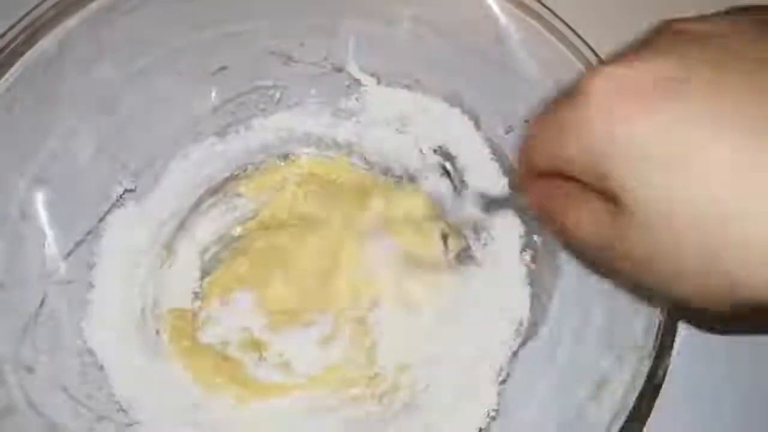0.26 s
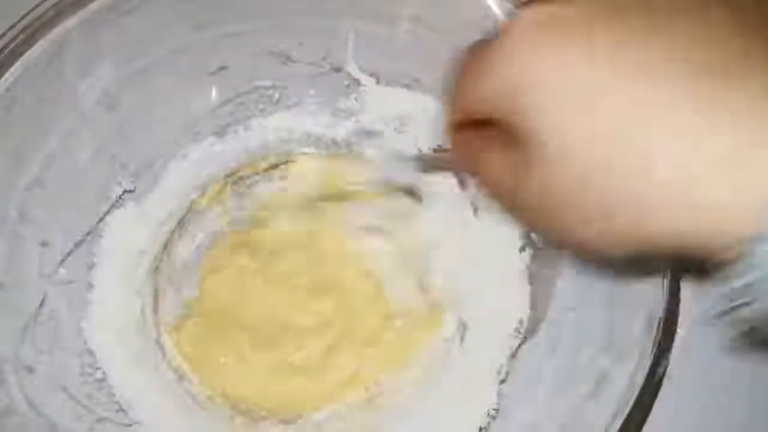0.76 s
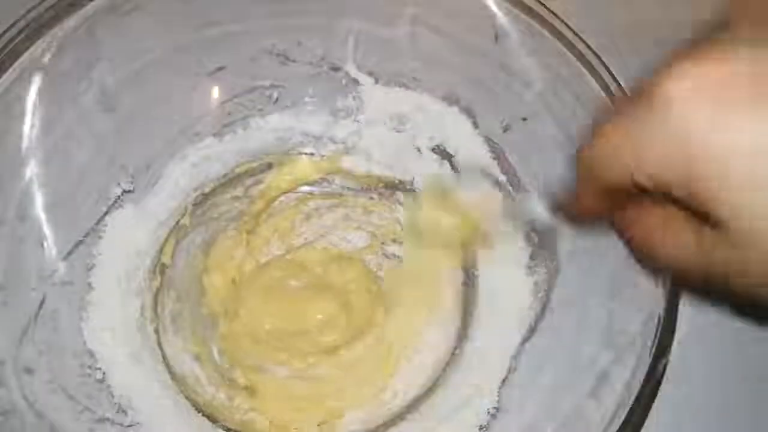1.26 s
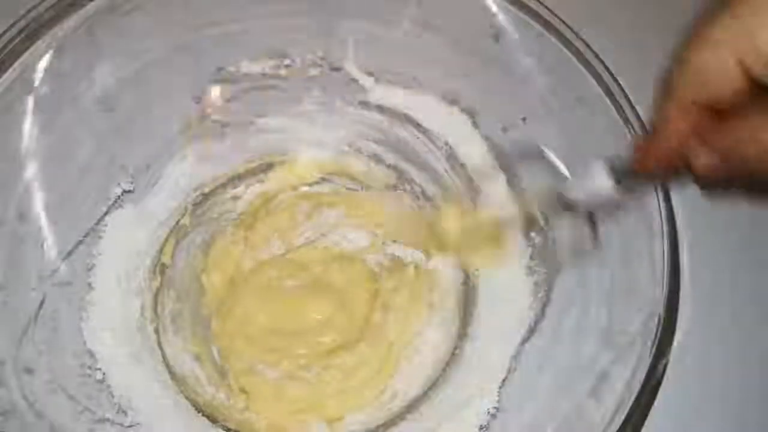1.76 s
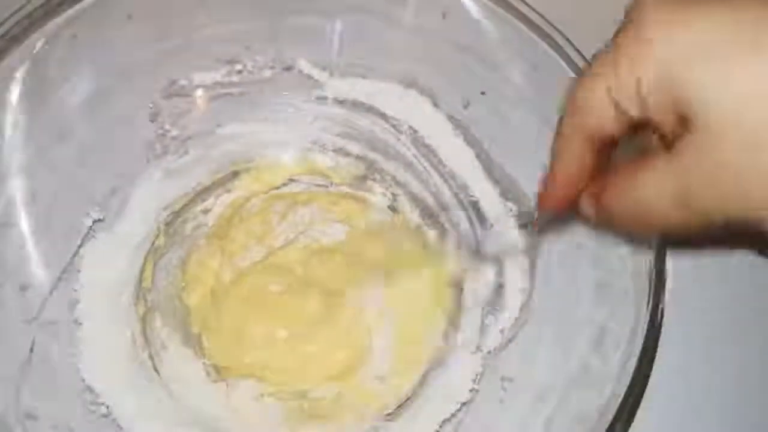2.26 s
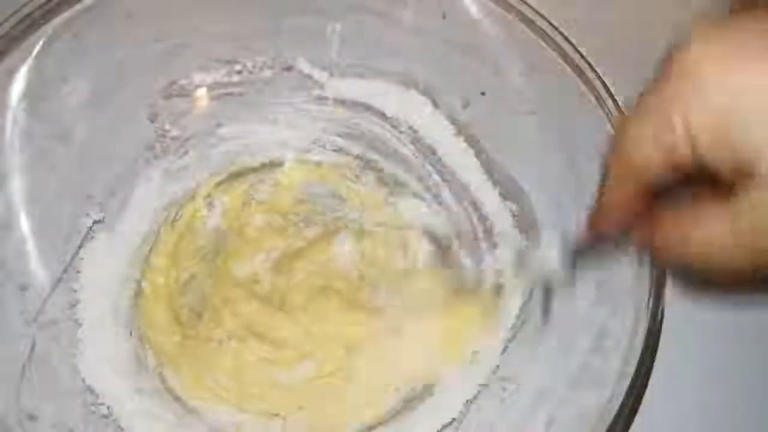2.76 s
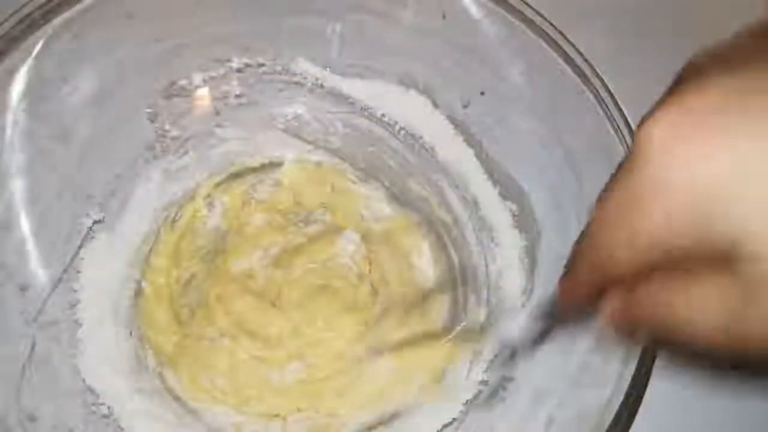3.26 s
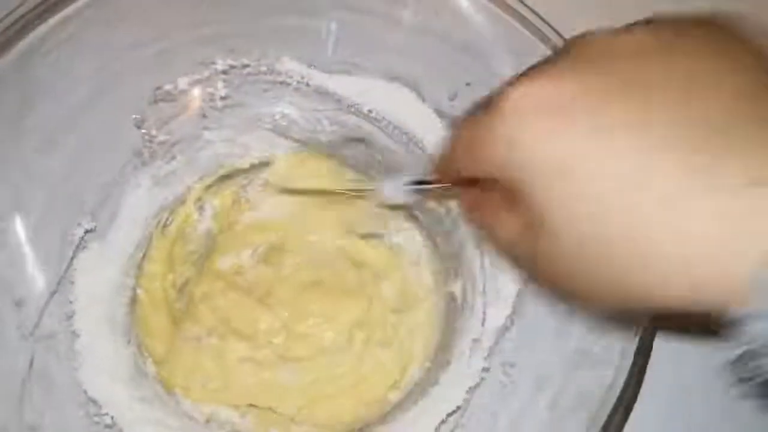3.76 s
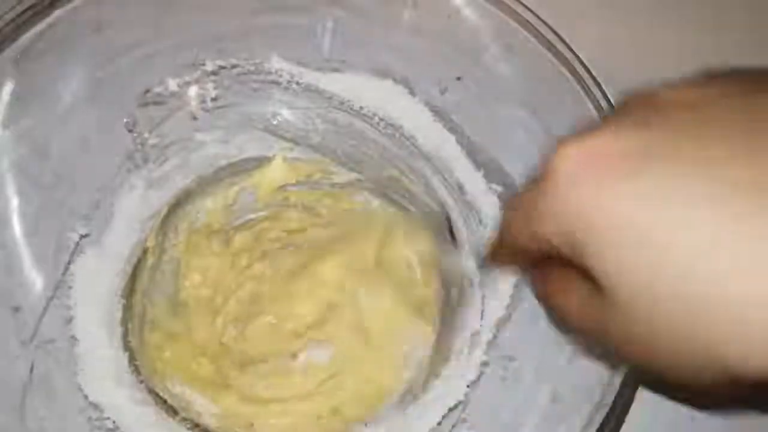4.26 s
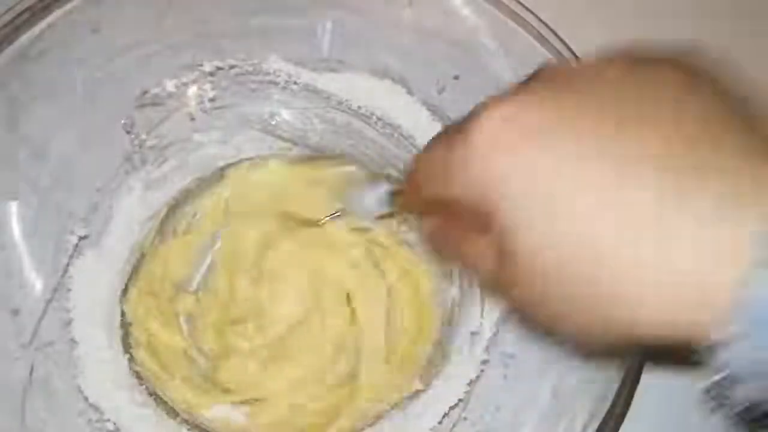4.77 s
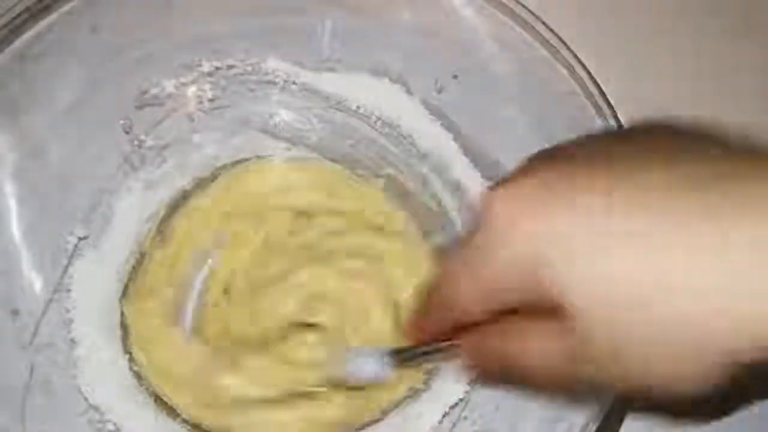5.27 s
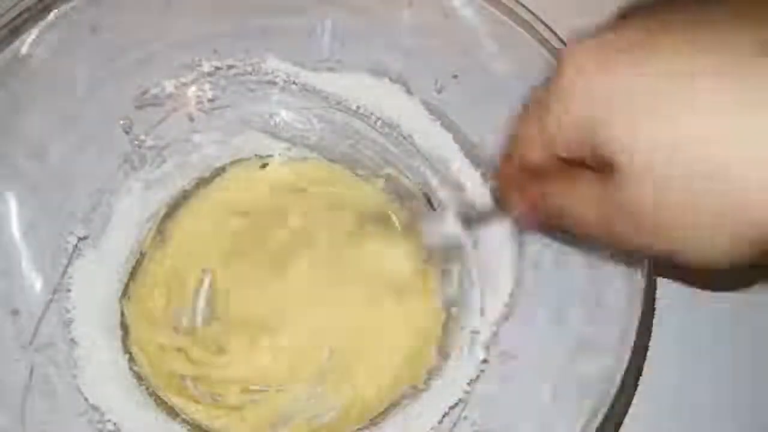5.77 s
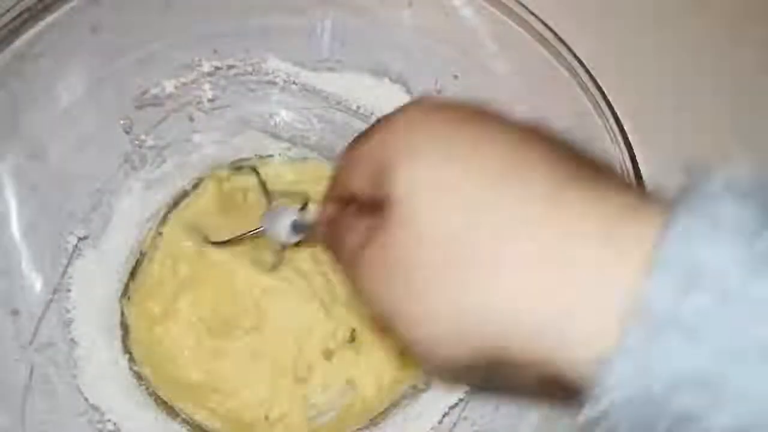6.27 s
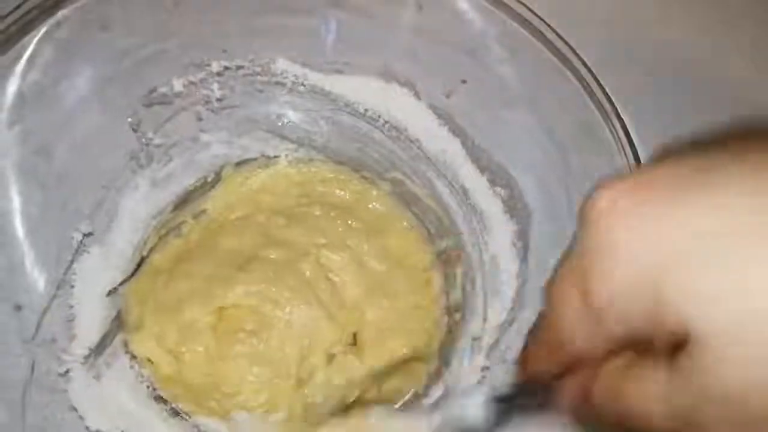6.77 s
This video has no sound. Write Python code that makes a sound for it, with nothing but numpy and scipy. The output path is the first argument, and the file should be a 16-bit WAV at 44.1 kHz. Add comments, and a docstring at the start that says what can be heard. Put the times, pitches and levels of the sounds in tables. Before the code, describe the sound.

A metal beater stirs batter in a glass bowl, close to the microphone in a kitchen. It opens with wire scrapes, a hollow bang further off and a sharp clink. Irregular scrapes, light clinks and faint squeaks follow while the bowl knocks on the worktop. Past the middle the batter squelches softly and a louder hit sets the bowl rocking briefly. A faint fan hiss and distant engine drone lie underneath.

```python
"""Hand beater in a glass bowl

A metal beater stirs batter on a kitchen worktop, close under a phone with two microphone ports.
Its wires scrape, squeak and clink on the glass, the bowl knocks and rocks, the batter squelches.
Something bangs once further off, and a distant engine drones over the hiss of a fan."""
import sys
import numpy as np
from scipy import signal
from scipy.fft import rfft, irfft, next_fast_len
from scipy.io import wavfile
from scipy.ndimage import uniform_filter1d

SR = 44100
rng = np.random.default_rng(int(sys.argv[2]) if len(sys.argv) > 2 else 0)


def store_wav(level_fs):
    """Save 16-bit WAV to argv[1]."""
    pcm = np.round(np.clip(np.atleast_2d(level_fs), -1, 1) * 32767)
    wavfile.write(sys.argv[1], SR, pcm.T.astype(np.int16))


N = 309582
T = np.arange(N) / SR

# wall modes of the glass bowl: (frequency [Hz], level [dB], t60 under a rub [s])
GLASS_MODES = [(1152, -8, 0.044), (2284, -14, 0.022), (2660, -15, 0.02), (3470, -9, 0.012),
               (3893, -2, 0.045), (3760, -7.5, 0.017), (5250, -1.9, 0.034), (5376, -3.5, 0.023),
               (5590, -8.5, 0.03), (6600, -9, 0.022), (6830, -0.2, 0.021), (7013, -4.5, 0.029),
               (7775, -4.5, 0.008), (10620, -18.5, 0.03)]


def wire_scrape(chatter, grit_per_s=2500, trail_db=-76.5, rasp_db=-11.5):
    """Grit under the sliding wires drives the wall modes, with a bright rasp on top."""
    # strokes along the glass: (time [s], level [dB], rise [s], fall [s], low trim [dB], top trim [dB])
    strokes = [(0.15, -45, 0.014, 0.014, -2.5, -8.5), (0.39, -62.5, 0.012, 0.026, 7, -6),
               (0.488, -49, 0.011, 0.027, -16, -16), (.69, -75, 0.048, 0.3, 0.1, -9),
               (1.148, -63, 0.033, 0.039, -11.5, -11), (1.243, -53.5, 0.051, 0.046, -3, -7),
               (1.325, -52.5, 0.015, 0.027, 1.5, 0.5), (1.762, -62.5, 0.035, 0.031, -28, -20),
               (1.955, -71.5, 0.16, 0.31, 2, -0.5), (2.23, -65, 0.017, 0.019, 4, 1.5),
               (2.87, -59, 0.084, 0.067, -4, 0.5), (3.18, -68, 0.065, 0.055, -1, -1),
               (3.359, -64, 0.031, 0.028, 1.3, 5.5), (3.684, -64.5, 0.061, 0.099, 1.5, -3.5),
               (3.946, -68.5, 0.021, 0.028, -8, 2.5), (4.241, -67.5, 0.05, 0.11, 2.5, -7),
               (4.516, -48, 0.0051, 0.057, -3.7, -7), (4.937, -65, 0.028, 0.056, 1, 9.5),
               (5.284, -68, 0.062, 0.044, 2, 3), (5.99, -68.5, 0.049, 0.023, -7, -1),
               (6.499, -64.5, 0.016, 0.044, 0.5, 3), (6.842, -60, 0.013, 0.071, 2.5, 3.5)]
    at, level_db, rise_s, fall_s, low_db, top_db = np.transpose(strokes)
    # light contact between strokes, broken twice as the beater lifts clear
    trail = undb(trail_db + 3.5 * walk(3.8))
    for lift_s in (1.473, 3.06):
        trail *= 1 - np.exp(-((T - lift_s) / 0.064) ** 2)
    low = swells(at, level_db + low_db, rise_s, fall_s) + trail
    middle = swells(at, level_db, rise_s, fall_s) + trail * undb(-5.5)
    top = swells(at, level_db + top_db, rise_s, fall_s) + trail
    grit = unit((rng.random(N) < grit_per_s / SR) * rng.exponential(size=N))
    rasp = band(band((grit + 2.5) * pair(1.0), 6900, 9000), 10000, 14000)
    out = top * undb(rasp_db) * unit(rasp)
    for hz, db, t60 in GLASS_MODES:
        # the contact travels over nodes and bellies, so each mode swells alone
        force = chatter * (grit + 0.92) * rng.standard_normal(N) * undb(2.5 * walk(17))
        pressure = top if hz > 6000 else middle if hz > 4500 else low
        out += ring(undb(db) * noise_drive(t60) * force * pressure, hz, t60)
    return out


def wire_clinks(scatter_db=2.5, skid_s=0.0025):
    """A wire hits the glass: a bright tick together with a short ring of the glass wall."""
    # wire on glass: (time [s], level [dB], spectral centre [Hz])
    hits = [(0.147, -33.5, 5400), (0.193, -39.5, 3840), (0.481, -23, 2110), (0.484, -40, 5500),
            (1.198, -37.5, 3420), (1.2307, -45, 5300), (1.318, -37.5, 5400), (1.326, -37.5, 5600),
            (1.517, -45, 3770), (1.811, -38.5, 2450), (2.105, -39, 4320), (2.587, -38, 2440),
            (2.862, -39, 5350), (2.888, -47.5, 5900), (3.357, -47, 3900), (3.944, -42.5, 3880),
            (4.491, -41.5, 5240), (4.51, -24, 3300), (5.281, -36, 2390), (5.648, -32, 2400),
            (5.656, -46, 1160), (5.878, -49, 1192), (5.997, -43.5, 1300), (6.27, -48, 1190),
            (6.494, -45.5, 6830), (6.836, -40.5, 4400)]
    at, level_db, centre_hz = np.transpose(hits)
    tick = unit(band(band(pair(0.3), 2400, 3100), 2600, 3600))
    out = tick * burst(at, level_db - 19.5, fade_s=0.0031)
    for hz, db, t60 in GLASS_MODES:
        drive_db = level_db + db / 2 + nearness_db(hz, centre_hz, 0.32)
        drive_db += scatter_db * rng.standard_normal(len(at))
        skid = blows(at, undb(drive_db), skid_s) * np.cos(2 * np.pi * hz * T)
        out += ring(skid, hz, 1.62 * t60)  # the wire lifts off, so the wall rings longer
    return out


def wire_squeaks(chatter):
    """One wire squeaks as it bends along the wall."""
    # squeaks: (time [s], level [dB], half length [s])
    squeaks = [(2.8, -63.5, 0.034), (3.33, -63, 0.021), (4.927, -61, 0.028)]
    at, level_db, half_s = np.transpose(squeaks)
    wire = ring(chatter * rng.standard_normal(N), hz=3456, t60=0.027)
    return unit(wire) * swells(at, level_db, half_s, half_s)


def bowl_knocks(scatter_db=2.5, rock_hz=664, clack_lead_s=0.0015):
    """The bowl clacks on the worktop and rings their joint modes; rocking rattles the same modes."""
    # bowl on worktop: (time [s], level [dB], spectral centre [Hz])
    knocks = [(0.2023, -45.5, 530), (0.4845, -43.5, 630), (1.5172, -44, 331.3), (1.561, -52, 560),
              (2.1055, -36.5, 534), (2.2319, -50.5, 384), (2.3886, -53.5, 484), (2.5241, -55, 540),
              (2.5875, -49, 771), (3.1735, -57.5, 557), (3.4285, -53, 534), (3.5958, -52, 306),
              (3.9105, -52, 568), (4.2647, -57, 492), (4.5115, -37, 800), (4.653, -61, 577),
              (4.7755, -57, 904), (4.9985, -57.5, 340), (5.8806, -60.5, 595), (6.271, -49.5, 267),
              (6.8186, -42.5, 368), (6.971, -52, 357)]
    # modes of bowl and worktop together: (frequency [Hz], level [dB], t60 [s])
    body_modes = [(162, -1.5, 0.086), (259.2, -4, 0.14), (301.5, -6, 0.2), (336, -2, 0.045),
                  (444.4, -3.5, 0.023), (552.3, 0.96, 0.16), (638, -4.5, 0.083), (713, -5, 0.049),
                  (775.5, -2.5, 0.038), (1046, -9.5, 0.073)]
    # the bowl rocking on its foot after a hard knock: (time [s], level [dB], half length [s])
    rocks = [(2.171, -47, 0.05), (2.652, -61, 0.034), (4.566, -47.5, 0.052)]
    at, level_db, centre_hz = np.transpose(knocks)
    rock_at, rock_db, half_s = np.transpose(rocks)
    rattle = swells(rock_at, rock_db, half_s, half_s) * undb(3.1 * walk(80)) * rng.standard_normal(N)
    out = 0
    for hz, db, t60 in body_modes:
        rocking = rattle * noise_drive(t60) * undb(db + nearness_db(hz, rock_hz, 0.15))
        out += ring(rocking, hz, t60, spread_s=0.00094)
        scatter, polarity = rng.standard_normal((2, len(at)))
        drive_db = level_db + db + nearness_db(hz, centre_hz, 0.73) + scatter_db * scatter
        force = blows(at, undb(drive_db) * np.sign(polarity), contact_s=0.00043)
        out += ring(force, hz, t60, spread_s=0.00067)
    # the first touch clacks just before the weight lands, harder in a brighter knock
    clack_db = level_db - 6 + 6 * np.log2(centre_hz / 550)
    clack = burst(at - clack_lead_s, clack_db, fade_s=0.0079) * unit(band(pair(0.78), 1200, 1500))
    return out + band(band(clack, 1300, 3800), 890, 2600)


def batter_squelch():
    """Batter and flour dragged round the bowl make a wet, grainy squelch."""
    # drags through the mixture: (time [s], level [dB], rise [s], fall [s])
    drags = [(3.796, -54.5, 0.037, 0.073), (3.95, -63.5, 0.063, 0.081), (5.27, -67.5, 0.1, 0.076),
             (5.6, -69, 0.19, 0.13)]
    grain = undb(3.3 * walk(70))
    squelch = grain * band(band(pair(0.16), 580, 2100), 710, 3300)
    return unit(squelch) * swells(*np.transpose(drags))


def far_bang(at_s=0.235, rise_s=0.0031, fade_s=0.0081):
    """A hollow, door-like slam: a dull thump that shakes the bowl's main mode into ringing."""
    # tone of the thump: (frequency [Hz], relative level [dB])
    spectrum = [(170, -31), (320, -5.5), (554, -5), (2000, -10), (3600, -32.5), (9000, -52)]
    age = np.maximum(T - at_s, 0)
    thump = unit(colour(pair(0.49), spectrum)) * np.exp(-age / fade_s) * (1 - np.exp(-age / rise_s))
    jolt = blows(np.array([at_s]), undb(-13), contact_s=0.0005)
    bowl = ring(jolt, hz=553, t60=0.14, spread_s=0.0003)
    return undb(-13) * (thump + bowl) * pan(1.7)


def distant_engine():
    """The engine's firing tone: a low, wavering drone in the centre."""
    # course of the drone: (time [s], firing tone [Hz], level [dB])
    drone = [(.1, 72.7, -89), (0.29, 73, -58), (.45, 88.4, -64.5), (0.7, 87.4, -91), (0.79, 88.7, -61.5),
             (0.9, 84.8, -52.5), (1.02, 87.6, -73.5), (1.22, 85, -67), (1.98, 74.7, -76), (2.23, 67, -63),
             (2.45, 69.3, -75), (2.95, 68.6, -67.5), (3.24, 67.8, -93), (3.55, 69.5, -59.5),
             (3.66, 76.5, -68), (4.05, 89.1, -65.5), (4.43, 92.7, -70), (4.56, 91.4, -57), (4.7, 87.6, -80),
             (7.02, 71.8, -76.5)]
    at, hz, db = np.transpose(drone)
    pitch_hz = np.interp(T, at, hz) * (1 + 0.064 * walk(14))
    gain = undb(np.interp(T, at, db) + 1.8 * walk(15))
    return np.sqrt(2) * gain * np.sin(2 * np.pi * np.cumsum(pitch_hz) / SR)


def fan_hiss(hiss_db=-69.5):
    """A steady bed of hiss under the fan's narrow, wavering noise bands."""
    # tone of the hiss: (frequency [Hz], relative level [dB])
    spectrum = [(20, -5.5), (50, -11.5), (110, -5.5), (190, -21), (860, -22.5), (2040, -27), (3600, -31),
                (7160, -31), (15600, -31.5)]
    # fan bands: (centre [Hz], width [Hz], level [dB])
    fan_bands = [(105, 39, -72.5), (1736, 19, -82), (1992, 220, -75.5)]
    out = unit(colour(pair(0.14), spectrum)) * undb(hiss_db)
    for hz, width_hz, db in fan_bands:
        out += unit(band(pair(0.13), hz, width_hz)) * undb(db + 1.7 * walk(2.816))
    return out


def room(x):
    """Diffuse kitchen echoes, dying fastest in the top treble."""
    # reverb decay: (band centre [Hz], t60 [s])
    decays = [(150, 0.75), (500, 0.3), (1500, 0.56), (4000, 0.49), (9000, 0.083)]
    t = np.arange(SR) / SR
    echo = sum(band(rng.standard_normal((2, SR)), hz, hz) * undb(-60 * t / t60) for hz, t60 in decays)
    echo *= np.minimum(t / 0.016, 1)
    echo /= np.sqrt(np.sum(echo ** 2) / 2)
    return signal.fftconvolve(x.mean(axis=0)[None], echo, axes=1)[:, :N]


def undb(db):
    """Decibels to gain."""
    return 10 ** (np.asarray(db) / 20)


def unit(x):
    """Scale to rms 1."""
    return x / np.sqrt(np.mean(x ** 2))


def pan(left_db):
    """Stereo gains with the left this much above the right."""
    return undb(np.array([[left_db], [-left_db]]) / 2)


def band(x, hz, width_hz):
    """Resonance with a peak gain of 1."""
    return signal.lfilter(*signal.iirpeak(hz, hz / width_hz, fs=SR), x)


def colour(x, table):
    """Equalise each channel with a curve of (frequency [Hz], gain [dB])."""
    hz, db = np.transpose(table)
    size = next_fast_len(N)
    bins_hz = np.arange(size // 2 + 1) * SR / size + 1
    gain = undb(np.interp(np.log(bins_hz), np.log(hz), db))
    return irfft(rfft(x, size) * gain, size)[..., :N]


def walk(rate):
    """Smooth random drift of rms 1, with `rate` new values a second."""
    hold = int(SR / rate)
    steps = np.repeat(rng.standard_normal(N // hold + 1), hold)
    return unit(uniform_filter1d(uniform_filter1d(steps, hold), hold)[:N])


def pair(correlation):
    """Stereo white noise, from wide (0) to mono (1)."""
    mid, side = rng.standard_normal((2, N)) * np.sqrt([[1 + correlation], [1 - correlation]])
    return np.array([mid + side, mid - side]) / np.sqrt(2)


def ring(force, hz, t60, spread_s=0.00033):
    """One damped mode; its belly lies nearer one port, so left and right arrive slightly apart."""
    fade, turn = np.exp(-np.log(1000) / (t60 * SR)), 2 * np.pi * hz / SR
    out = signal.lfilter([0, fade * np.sin(turn)], [1, -2 * fade * np.cos(turn), fade ** 2], force)
    return np.array([np.roll(out, int(spread_s * SR * rng.uniform(-1, 1))), out])


def noise_drive(t60):
    """Gain that keeps a noise-driven mode equally loud however long it rings."""
    return np.sqrt(np.log(1000) / (t60 * SR))


def nearness_db(hz, centre_hz, width_oct):
    """A mode is driven less the further it lies from a blow's spectral centre."""
    return -6 * (np.log2(hz / centre_hz) / width_oct) ** 2


def blows(seconds, gain, contact_s):
    """A smooth push for each blow."""
    force = np.zeros(N)
    force[(seconds * SR).astype(int)] = gain
    push = np.hanning(int(contact_s * SR) + 3)
    return np.convolve(force, push / push.sum())[:N]


def burst(seconds, db, fade_s):
    """An envelope that jumps at each blow and dies away."""
    return signal.lfilter([1], [1, -np.exp(-1 / (fade_s * SR))], blows(seconds, undb(db), 0.0033))


def swells(seconds, db, rise_s, fall_s):
    """An envelope of bell-shaped swells."""
    return sum(undb(level) * np.exp(-((T - at) / np.where(T < at, rise, fall)) ** 2)
               for at, level, rise, fall in zip(seconds, db, rise_s, fall_s))


def scene():
    """The wires are close and fairly dry, the knocks wetter, the bang wettest."""
    chatter = unit(undb(4 * walk(110)))  # the wires stick and jump about a hundred times a second
    wires = (wire_scrape(chatter) + wire_clinks() + wire_squeaks(chatter)) * pan(2.3)
    # small struck things radiate little bass
    bass_cut = signal.butter(2, 140, "high", fs=SR, output="sos")
    bowl = signal.sosfilt(bass_cut, bowl_knocks())
    bang = signal.sosfilt(bass_cut, far_bang())
    reverb = room(undb(-10.5) * wires + undb(-6) * bowl + undb(-4.5) * bang)
    return wires + bowl + bang + reverb + batter_squelch() + distant_engine() + fan_hiss()


def record(dry, top_hz=15750):
    """Close ports narrow bass and top; the treble drops steeply near 8 kHz; the very top is cut."""
    # side-signal response of the two ports: (frequency [Hz], gain [dB])
    stereo_width = [(100, -17), (280, -4.5), (500, 2), (2000, 1), (8000, -4.5), (14000, -16.5)]
    # overall tone with a step down in the treble: (frequency [Hz], gain [dB])
    treble_shelf = [(20, 5.5), (7400, 4), (8600, -6)]
    mid, side = dry.mean(axis=0), colour((dry[0] - dry[1]) / 2, stereo_width)
    heard = colour(np.array([mid + side, mid - side]), treble_shelf)
    return signal.sosfilt(signal.ellip(10, .2, 60, top_hz, fs=SR, output="sos"), heard)


dry = scene()
out = record(dry)
store_wav(out)
```